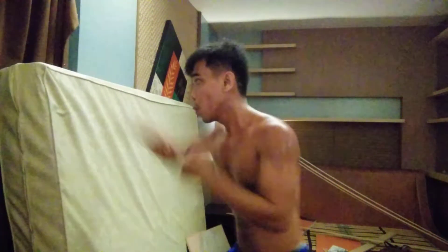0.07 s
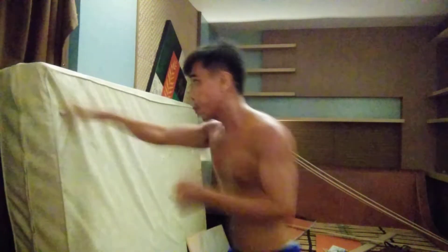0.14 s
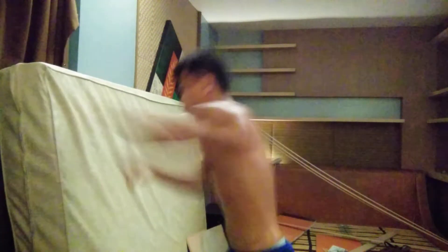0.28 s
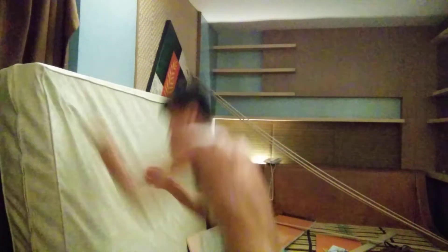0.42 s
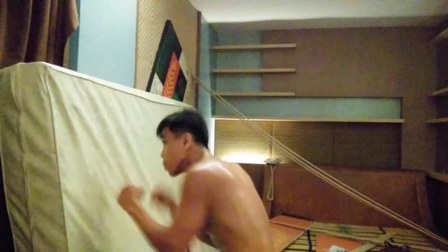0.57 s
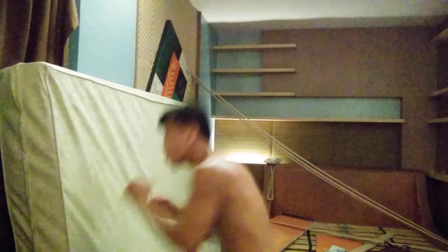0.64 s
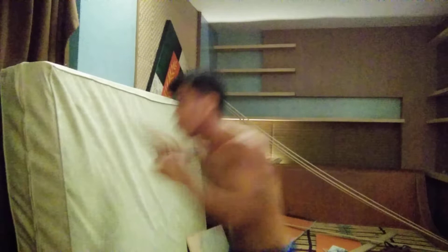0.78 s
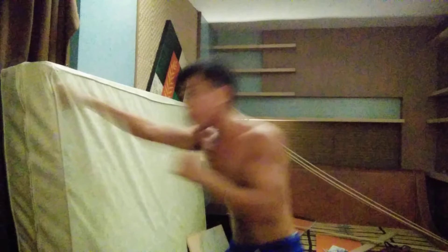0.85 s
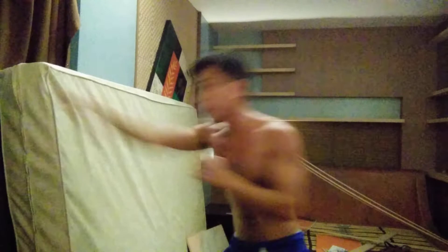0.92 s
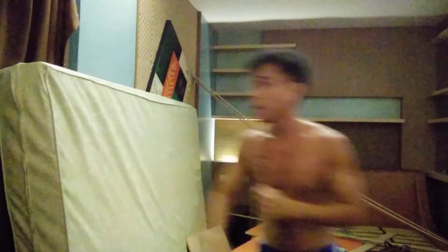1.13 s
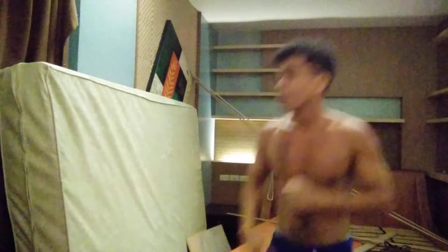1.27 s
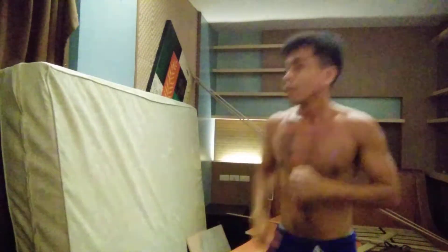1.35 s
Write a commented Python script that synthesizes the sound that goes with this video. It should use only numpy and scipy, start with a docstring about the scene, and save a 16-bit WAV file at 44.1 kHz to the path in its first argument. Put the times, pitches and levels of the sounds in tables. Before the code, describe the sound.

Bare fists punch an upright mattress in a small, reverberant room. An earlier blow is dying away at the start. At 0.23 s a loud slap with a low boom lands, at 0.43 s a duller, boomy thump without much crack. After a short brushing of cloth, a softer thud comes at 0.94 s. Faint foot slides and two tiny taps follow around 1.24-1.34 s, over very quiet hum and air.

```python
"""Fists against a mattress

Bare fists hit an upright mattress in a small, hard-walled room; an earlier blow is still dying away.
Each punch slaps the cover (filtered noise), knocks the padding (a damped cosine) and sets the mattress
booming and ringing (decaying sines); the ceiling and walls answer with echoes and decaying noise.
Grainy noise brushes and slides between blows, a foot taps twice, and a faint hum and air lie beneath.
"""
import sys
import numpy as np
from scipy import signal
from scipy.io import wavfile
from scipy.ndimage import uniform_filter1d

SR = 44100
rng = np.random.default_rng(int(sys.argv[2]) if len(sys.argv) > 2 else 0)


def generate_wav(signal):
    """Clip the signal to [-1, 1] and save it as 16-bit WAV at the path in sys.argv[1]."""
    frames = np.transpose(np.atleast_2d(signal))
    scaled = np.clip(frames, -1, 1) * 32767
    pcm = np.round(scaled).astype(np.int16)
    wavfile.write(sys.argv[1], SR, pcm)


N = 61739
T = np.arange(SR) / SR  # one second after an onset, in s
# Levels of single sounds are energies: 0 dB is that of one second at rms 1, before the suppressor.


def amp(db):
    """Decibel law: level to amplitude gain."""
    return 10 ** (np.asarray(db) / 20)


def unit(x):
    """Energy normalisation: scales to the energy of one second at rms 1."""
    return x / np.sqrt(np.sum(x ** 2) / SR + 1e-20)


def read(points, hz):
    """Interpolation along a logarithmic frequency axis."""
    f, value = np.transpose(points)
    return np.interp(np.log(hz + 1), np.log(f), value)


def add(mix, s, sound):
    """Superposition: adds a sound at time s, which may lie before the start."""
    at = round(s * SR)
    sound = sound[max(-at, 0):]
    part = mix[max(at, 0):][:len(sound)]
    part += sound[:len(part)]


def colour(x, points, size=4096):
    """Minimum-phase filtering: the Hilbert transform of the log gain gives a causal response; energy 1."""
    hz = abs(np.fft.fftfreq(size, 1 / SR))
    log_gain = np.log(amp(read(points, hz)))
    response = np.exp(np.conj(signal.hilbert(log_gain)))
    taps = np.fft.ifft(response).real[:size // 2]
    return unit(signal.fftconvolve(x, taps)[:len(x)])


def swell(rise_s, fall_s):
    """Exponential build-up and decay, given by their time constants."""
    return (1 - np.exp(-T / rise_s)) * np.exp(-T / fall_s)


# Spectrum of the room's air: f/Hz, relative level/dB per Hz
AIR_SPECTRUM = [(25, 0), (100, -4), (250, 14), (550, 0), (1200, -29), (1750, 24), (2300, -11), (4500, 1),
                (8000, 15.5), (11000, -18), (16000, -23)]
AIR_DB = -66  # rms level
HUM_HZ, HUM_DB = 119, -74  # frequency, rms level


def background():
    """Stationary sound: a pure tone for the hum, filtered noise for the air."""
    hum = amp(HUM_DB) * np.sqrt(2) * np.sin(2 * np.pi * HUM_HZ * np.arange(N) / SR)
    air = colour(rng.standard_normal(N), AIR_SPECTRUM)
    return hum + amp(AIR_DB) * np.sqrt(N / SR) * air


# Quick reverberant decay: f/Hz, t60/s
QUICK_DECAY = [(60, 0.58), (170, 0.46), (400, 0.36), (1000, 0.2), (3000, 0.52), (7000, 0.43), (15000, 0.6)]
# Slow reverberant decay: f/Hz, starting level/dB relative to the quick decay
SLOW_LEVEL = [(60, -26), (200, -38), (600, -4.5), (1500, -7), (4000, -13), (8000, -23.5), (15000, -16.5)]
SLOW_T60, ROOM_RISE_S = 1.144, 0.0036  # s


def room(x, size=256):
    """Diffuse reverberation: convolution with fresh noise decaying quickly, then slowly; rms as x."""
    hz, t, z = signal.stft(rng.standard_normal(SR), SR, nperseg=size)
    quick = amp(-60 * t / read(QUICK_DECAY, hz)[:, None])
    slow = amp(read(SLOW_LEVEL, hz)[:, None] - 60 * t / SLOW_T60)
    tail = signal.istft(z * (quick + slow), SR, nperseg=size)[1][:SR]
    tail = tail * (1 - np.exp(-T / ROOM_RISE_S))
    return unit(signal.fftconvolve(x, tail)[:SR]) * np.std(x)


# Spectrum of the knuckles' crack: f/Hz, relative level/dB per Hz
CRACK_SPECTRUM = [(100, -29), (500, 2), (1350, 2.5), (2300, 1.5), (3600, -2), (4600, 0.5), (5600, -7.5),
                  (6900, 6.5), (8500, 3), (10500, -6.5), (13000, -23), (16000, -23)]
# Spectrum of the crumpling cover: f/Hz, relative level/dB per Hz
CRUSH_SPECTRUM = [(30, -11.5), (80, 11.5), (220, 19), (550, 8.5), (1100, 9), (2000, 2), (3200, -1.5),
                  (4800, 4), (8000, 4), (10000, -14), (12500, -18.5), (16000, -40)]
CRACK_FALL_S, CRUSH_RISE_S, CRUSH_FALL_S = 0.00056, 0.006, 0.0075  # time constants
ECHO_S, ECHO_DB = 0.007, 4  # delay and gain of the crack's first reflection
ECHO_BAND_HZ = (3400, 8400)


def slap(crack_db, crush_db, direct_db=-1.5, crack_room_db=-2):
    """Impulsive excitation: knuckles crack on the taut cover, which crumples; a bright echo and room follow."""
    click = signal.unit_impulse(SR)
    burst = rng.standard_normal(SR) * np.exp(-T / CRACK_FALL_S)
    crack = amp(crack_db) * colour(unit(click) + unit(burst), CRACK_SPECTRUM)
    bright = signal.butter(2, ECHO_BAND_HZ, "band", fs=SR, output="sos")
    add(crack, ECHO_S, amp(ECHO_DB) * signal.sosfilt(bright, crack))
    crush = colour(rng.standard_normal(SR) * swell(CRUSH_RISE_S, CRUSH_FALL_S), CRUSH_SPECTRUM)
    crush_room = room(colour(click, CRUSH_SPECTRUM))
    cover = amp(crush_db) * (amp(direct_db) * crush + crush_room)
    return crack + amp(crack_room_db) * room(crack) + cover


def knock(db, hz, rise_s, fall_s, room_db):
    """Heavily damped resonance: a brief ring, with its room sound."""
    shape = swell(rise_s, fall_s) * (1 - np.exp(-T / rise_s))
    dry = amp(db) * unit(np.gradient(np.cos(2 * np.pi * hz * T) * shape))
    return dry + amp(room_db) * room(dry)


BOOM_T60, BOOM_ROOM_DB = 0.21, -17  # s, dB relative to the direct boom
BOOM_SAG, BOOM_SAG_S = 0.25, 0.02  # fraction by which the pitch starts high, time constant


def boom(db, hz, swell_s):
    """Fundamental resonance: the mattress swings as a whole, its pitch sagging as the fist sinks in."""
    turns = np.cumsum(hz * (1 + BOOM_SAG * np.exp(-T / BOOM_SAG_S))) / SR
    shape = (1 - np.exp(-(T / swell_s) ** 2)) * np.exp(-np.log(1000) * T / BOOM_T60)
    dry = amp(db) * unit(np.sin(2 * np.pi * turns) * shape)
    return dry + amp(BOOM_ROOM_DB) * room(dry)


# Long modes of mattress and room: f/Hz, level/dB relative to the crush, t60/s
MODES = [(43, -27.5, 0.47), (75.7, -20, 0.51), (125.1, -8, 0.56), (300, -13.5, 0.35), (412, -25, 1.18),
         (432, -23.5, 1.12), (482.4, -28.5, 0.63), (596, -17, .95), (732, -22, 1.3)]
MODE_RISE_S = 0.016


def rings():
    """Modal superposition: low modes, each of random phase, outlast the blow."""
    total = 0
    for hz, db, t60 in MODES:
        tone = np.sin(2 * np.pi * (hz * T + rng.random()))
        total = total + amp(db) * unit(tone * swell(MODE_RISE_S, t60 / np.log(1000)))
    return total


# Blows: t/s, crack level/dB, crush level/dB, knock level/dB, knock f/Hz,
# boom level/dB, settled boom f/Hz, boom swell/s
BLOWS = [(-.12, -47.5, -44, -48, 413, -65, 121, 0.017), (.2342, -42, -39.5, -43, 457, -37.5, 134.4, 0.02),
         (0.4254, -57, -42.5, -60, 508, -38, 166.2, 0.0043),
         (0.9436, -66.5, -47.5, -47.5, 332, -54, 134, 0.026)]
KNOCK_RISE_S, KNOCK_FALL_S, KNOCK_ROOM_DB = 0.00092, 0.0033, -5
WALL_S, WALL_DB = 0.0125, -1.5  # delay and gain of the knock's return from a wall


def punches(mix):
    """Superposed responses to one impact: slap, knock, boom and rings, with a delayed wall reflection."""
    for s, crack_db, crush_db, knock_db, knock_hz, boom_db, boom_hz, swell_s in BLOWS:
        cover = slap(crack_db, crush_db)
        padding = knock(knock_db, knock_hz, KNOCK_RISE_S, KNOCK_FALL_S, KNOCK_ROOM_DB)
        mattress = boom(boom_db, boom_hz, swell_s) + amp(crush_db) * rings()
        add(mix, s, cover + padding + mattress)
        add(mix, s + WALL_S, amp(WALL_DB) * padding)


def rub(length, db, growth_db, spectrum, grain_db=2, room_db=1.97):
    """Friction noise: grains of random strength grow over the length, then stop."""
    strength_db = grain_db * np.repeat(rng.standard_normal(SR), 32)[:SR]  # one grain lasts 32 samples
    grains = rng.standard_normal(SR) * amp(strength_db)
    growth = amp(growth_db * np.minimum(T / length, 1)) * (T < length)
    dry = amp(db) * colour(grains * growth, spectrum)
    return dry + amp(room_db) * room(dry)


# Fist and arm sweeping in against the cover: t/s, length/s, level/dB, growth/dB
BRUSH_STROKES = [(0.214, 0.049, -62.5, 11.5), (0.413, 0.0075, -53, 10), (0.916, .03, -52, 36.5)]
# Spectrum of the brushed cover: f/Hz, relative level/dB per Hz
BRUSH_SPECTRUM = [(40, -17), (150, 2), (450, 7), (900, 4), (2500, 6), (7500, 0.5), (10000, -6.5),
                  (16000, -50)]


def brushes(mix):
    """Sliding friction of fist and arm on cloth."""
    for s, length, db, growth_db in BRUSH_STROKES:
        add(mix, s, rub(length, db, growth_db, BRUSH_SPECTRUM))


# Feet sliding on the floor: t/s, length/s, level/dB
FOOT_SLIDES = [(0.851, 0.045, -87), (1.24, 0.032, -74), (1.285, .045, -76.5)]
# Spectrum of the sliding feet: f/Hz, relative level/dB per Hz
SLIDE_SPECTRUM = [(100, -22), (600, -28), (1200, -2), (3000, -6.5), (5500, -2.5), (8000, 7), (10500, -5.5),
                  (16000, -33)]


def slides(mix, growth_db=6):
    """Sliding friction of feet on the floor."""
    for s, length, db in FOOT_SLIDES:
        add(mix, s, rub(length, db, growth_db, SLIDE_SPECTRUM))


# Soft taps of a foot: t/s, level/dB, f/Hz
FOOT_TAPS = [(1.3164, -71, 383), (1.3408, -69.5, 530)]
TAP_RISE_S, TAP_FALL_S, TAP_ROOM_DB = 0.0019, 0.0023, -0.5


def taps(mix):
    """Damped impact of a foot."""
    for s, db, hz in FOOT_TAPS:
        add(mix, s, knock(db, hz, TAP_RISE_S, TAP_FALL_S, TAP_ROOM_DB))


def scene():
    """Superposition of punches, brushes and footwork over the background."""
    mix = background()
    punches(mix)
    brushes(mix)
    slides(mix)
    taps(mix)
    return mix[None]


# Level below which the noise suppressor closes: f/Hz, level/dB per Hz
THRESHOLD = [(50, -112), (120, -102), (220, -85), (600, -89.5), (1200, -88), (2500, -101), (5000, -105),
             (8000, -111), (12000, -118), (16000, -128)]
GATE_SLOPE, GATE_DEPTH_DB = 1.3, 14  # dB of cut per dB below the threshold, greatest cut
EDGE_HZ = 16100  # upper band limit


def record(dry, size=1024):
    """Downward expansion: a noise suppressor lowers each band while it is quiet; then a low-pass."""
    frames = dict(nperseg=size, noverlap=size * 3 // 4, scaling="psd")
    hz, t, z = signal.stft(dry[0], SR, **frames)
    power = uniform_filter1d(abs(z) ** 2, size=5, axis=0)  # smoothed over frequency
    power = uniform_filter1d(power, size=5, axis=1)  # and over time
    under_db = read(THRESHOLD, hz)[:, None] - 10 * np.log10(abs(power) + 1e-20)
    z = z * amp(-np.clip(GATE_SLOPE * under_db, 0, GATE_DEPTH_DB))
    gated = signal.istft(z, SR, **frames)[1][:N]
    low_pass = signal.firwin(511, EDGE_HZ, window=("kaiser", 9), fs=SR)
    return signal.oaconvolve(gated, low_pass, "same")[None]


dry = scene()
out = record(dry)
generate_wav(out)
```